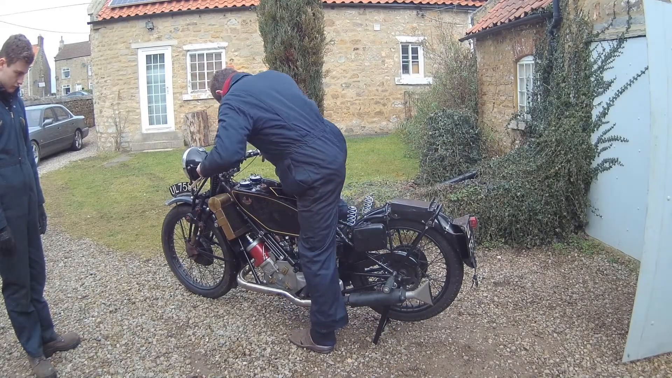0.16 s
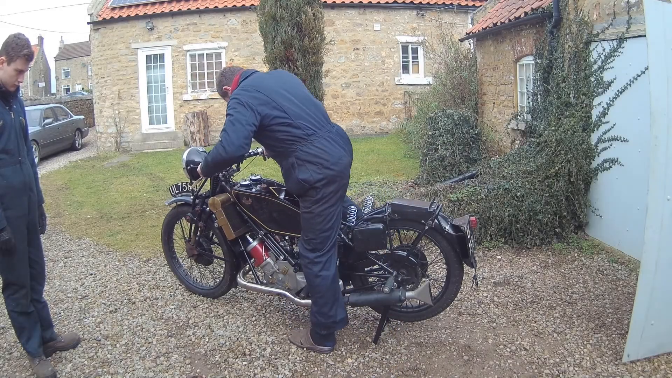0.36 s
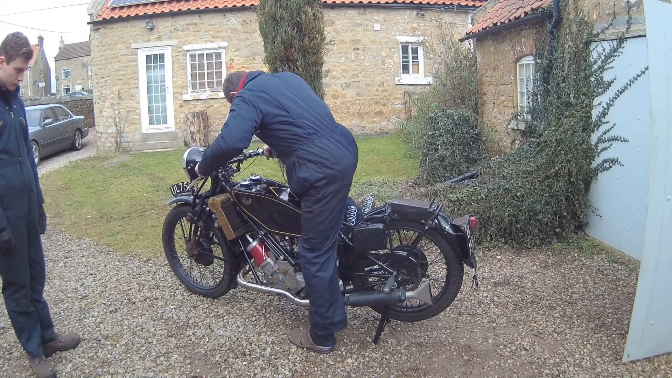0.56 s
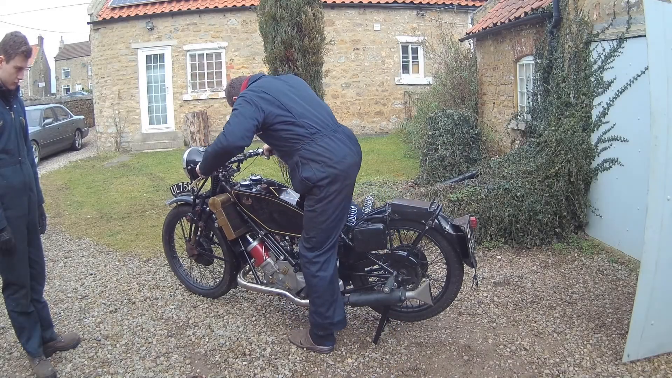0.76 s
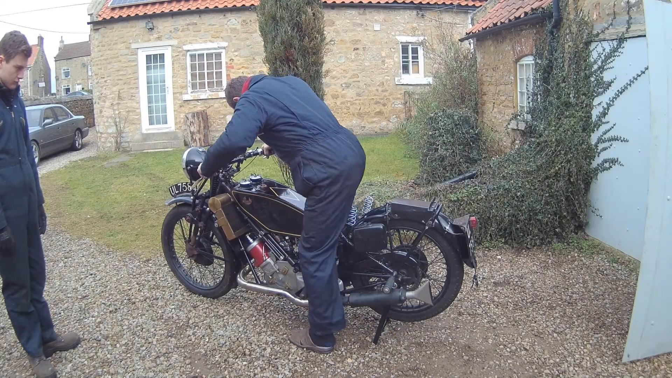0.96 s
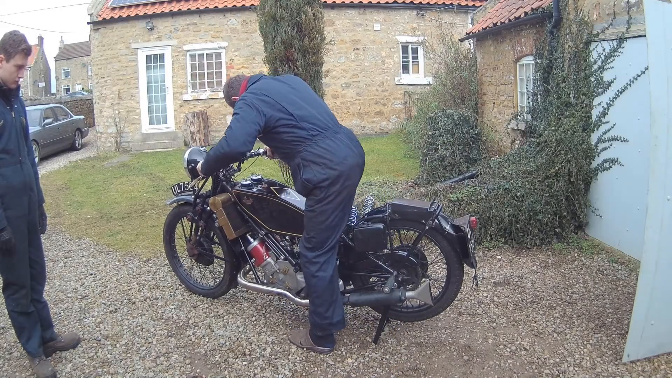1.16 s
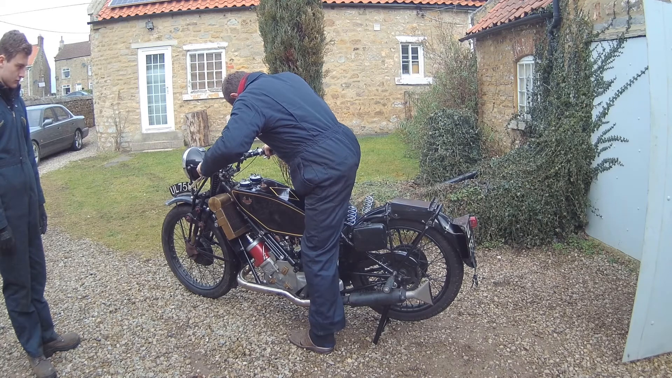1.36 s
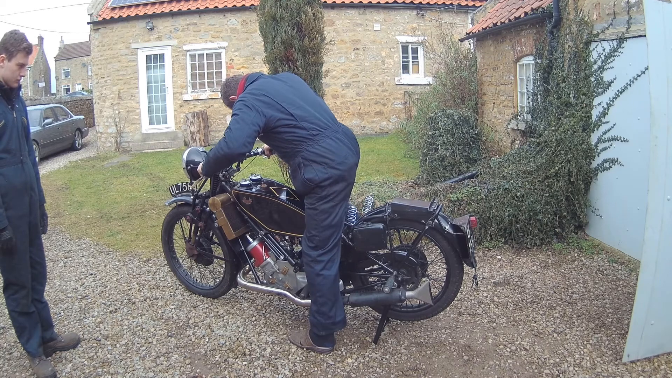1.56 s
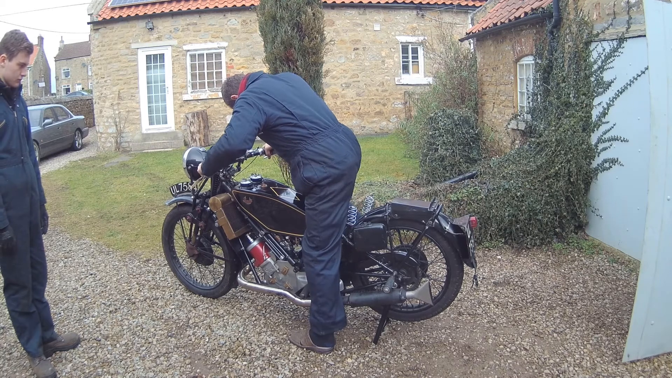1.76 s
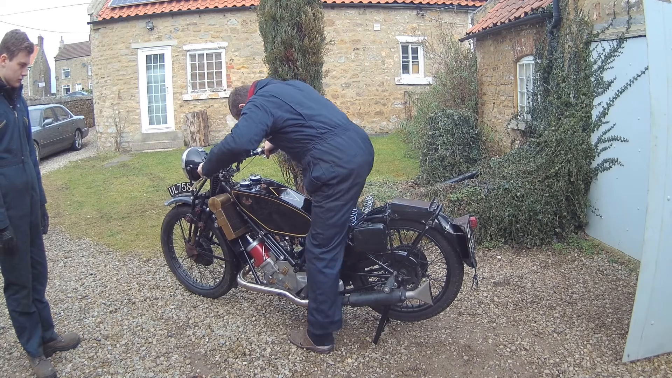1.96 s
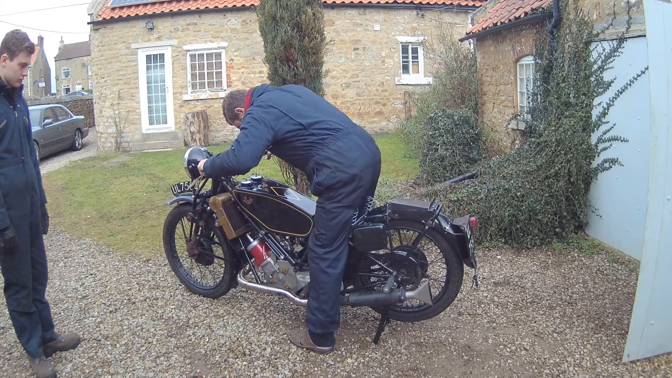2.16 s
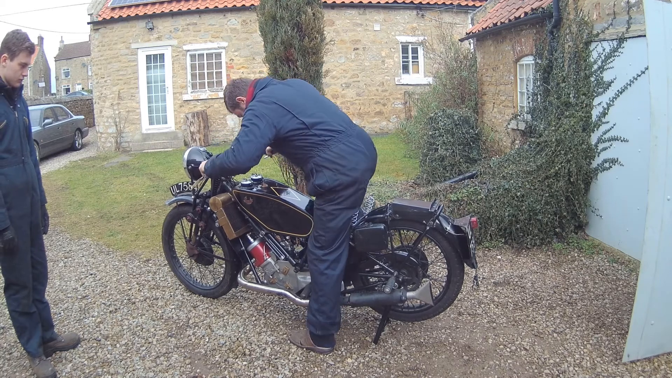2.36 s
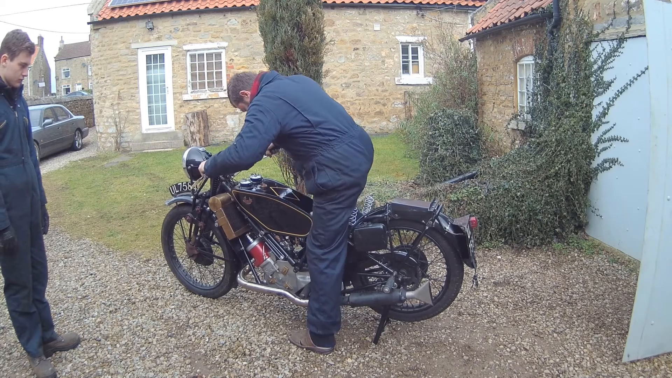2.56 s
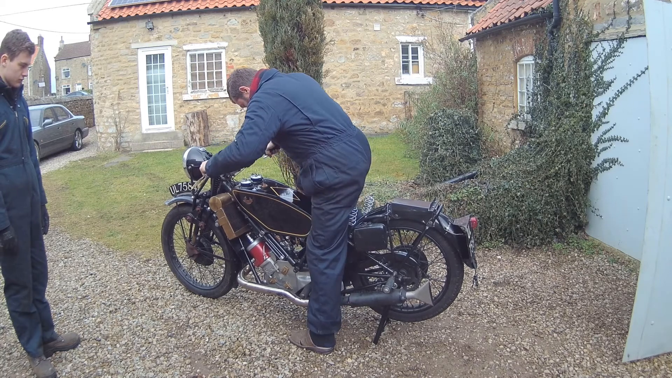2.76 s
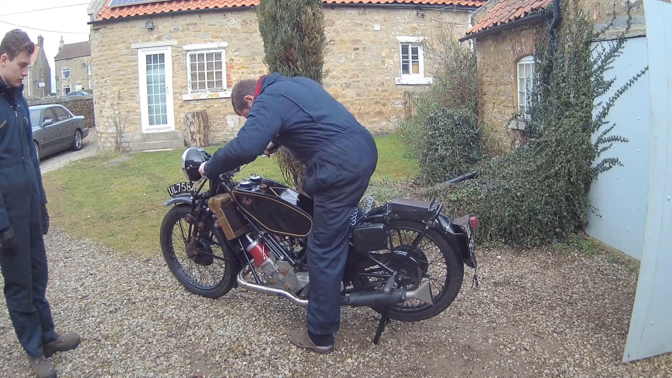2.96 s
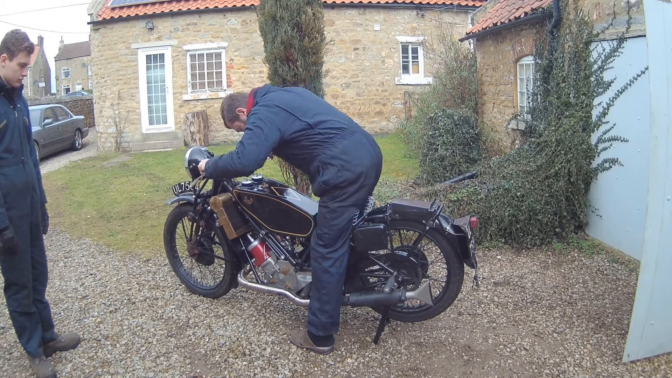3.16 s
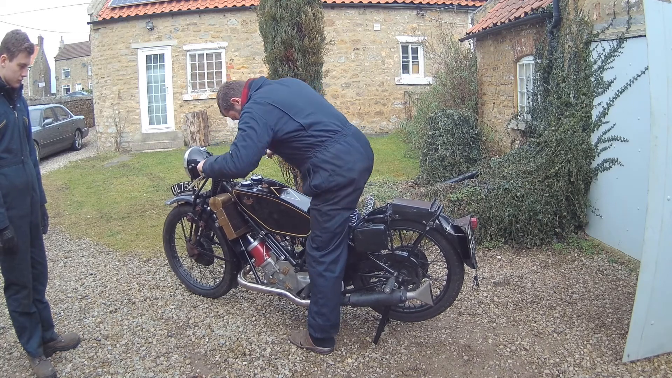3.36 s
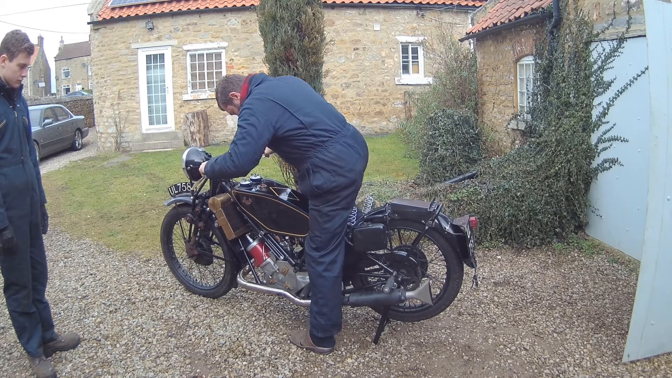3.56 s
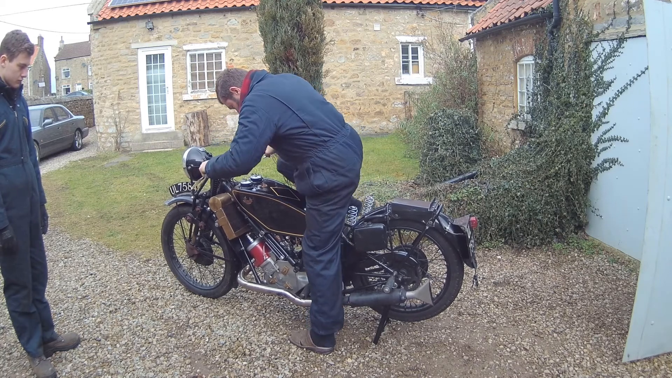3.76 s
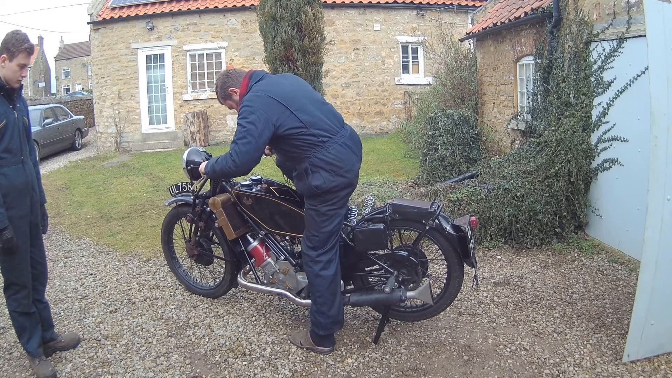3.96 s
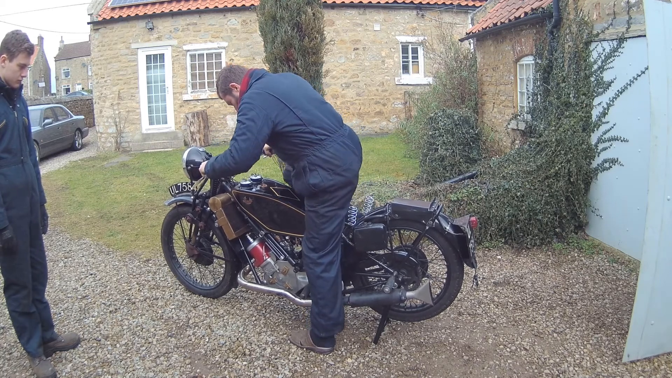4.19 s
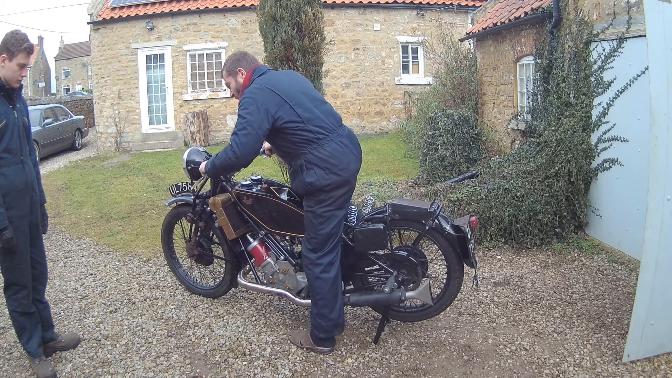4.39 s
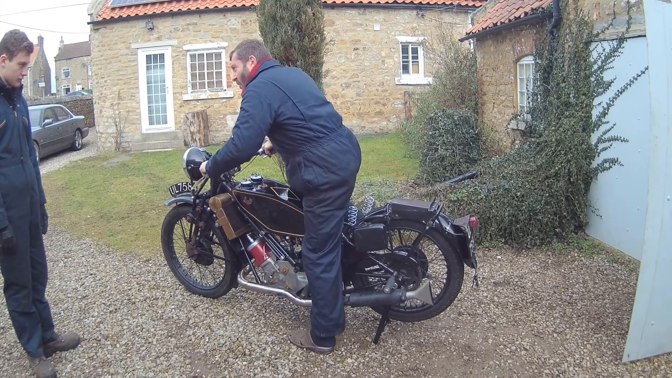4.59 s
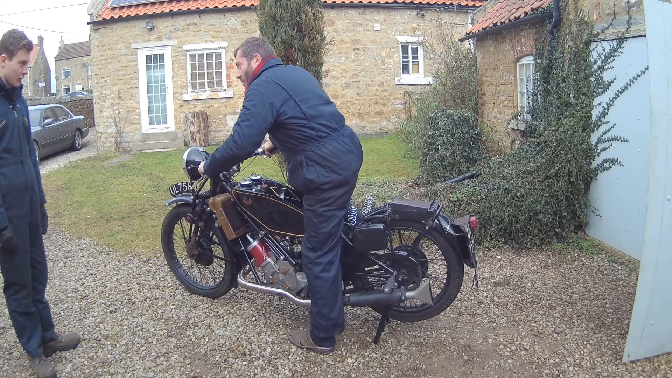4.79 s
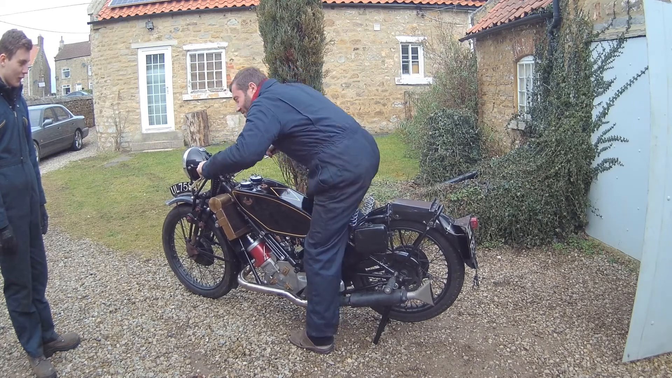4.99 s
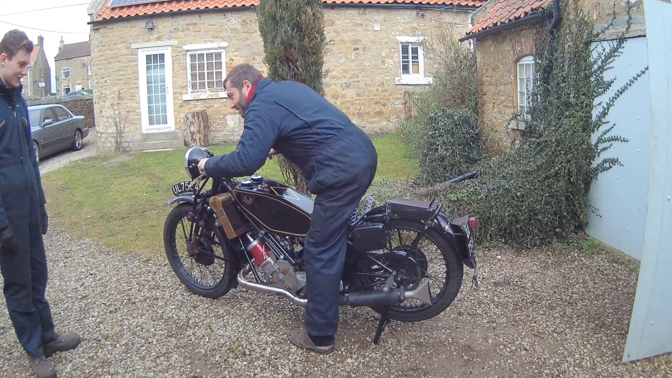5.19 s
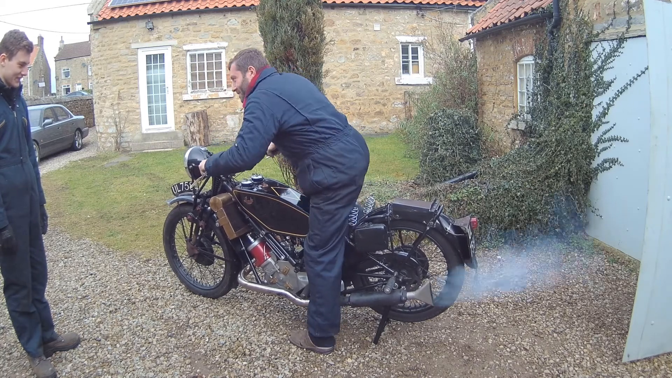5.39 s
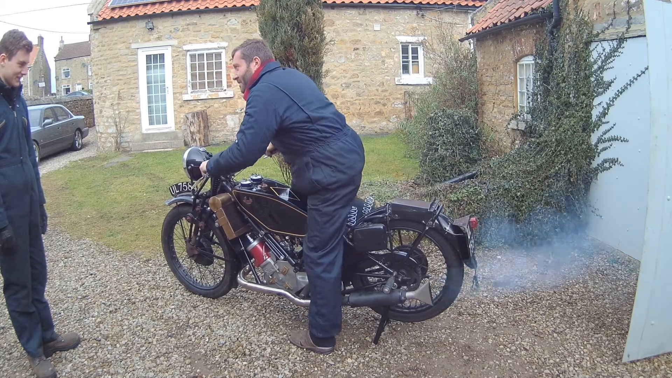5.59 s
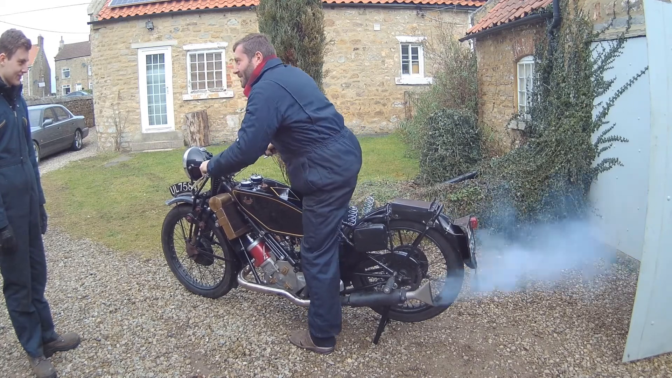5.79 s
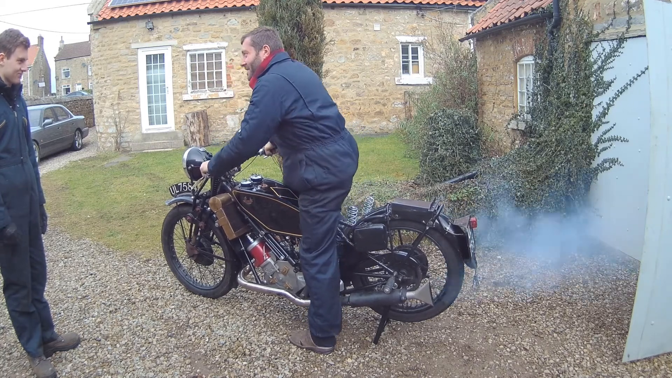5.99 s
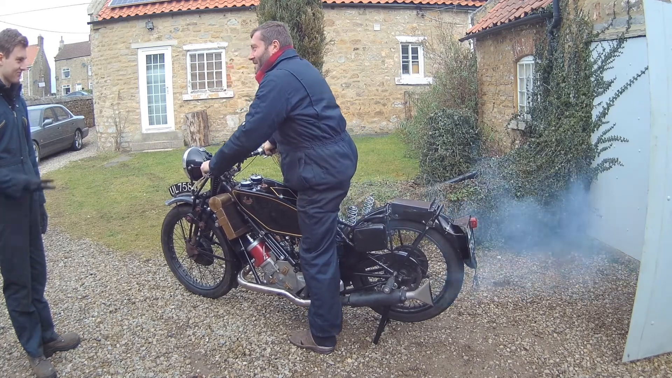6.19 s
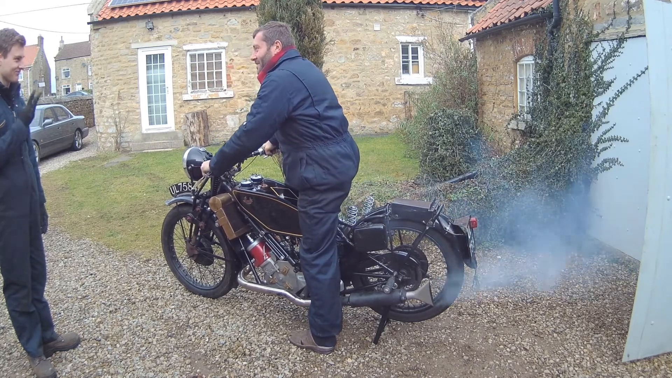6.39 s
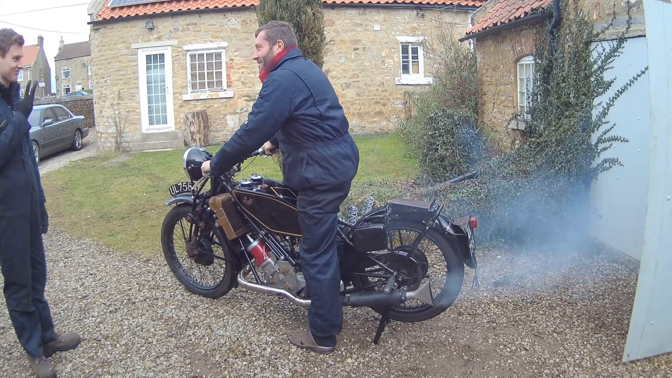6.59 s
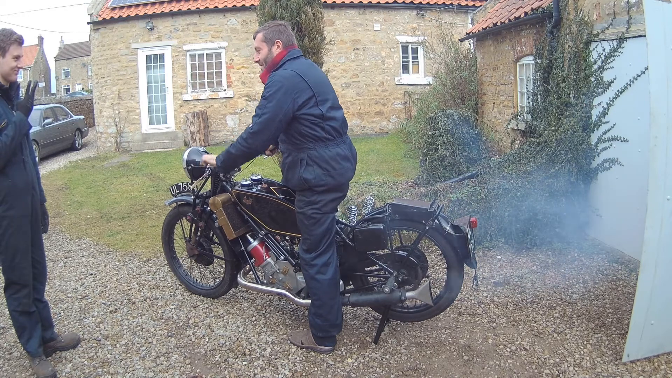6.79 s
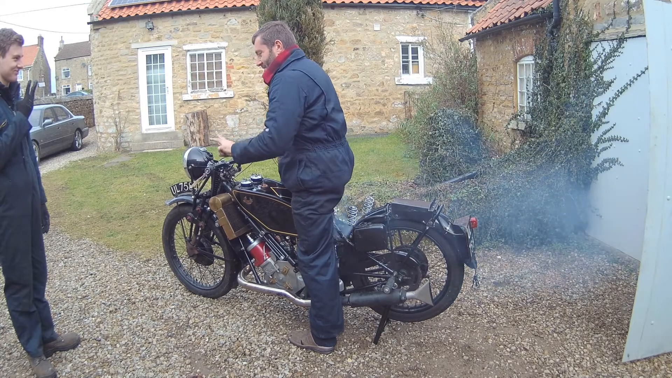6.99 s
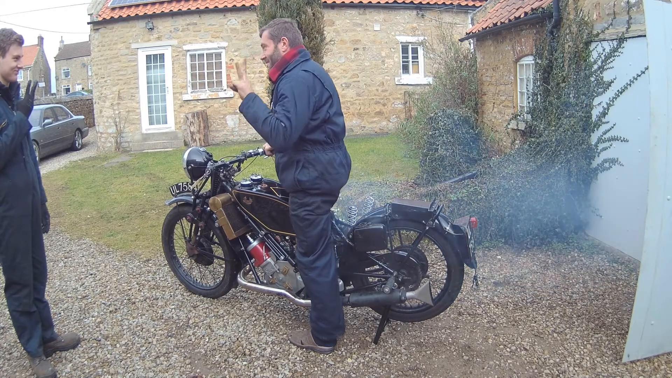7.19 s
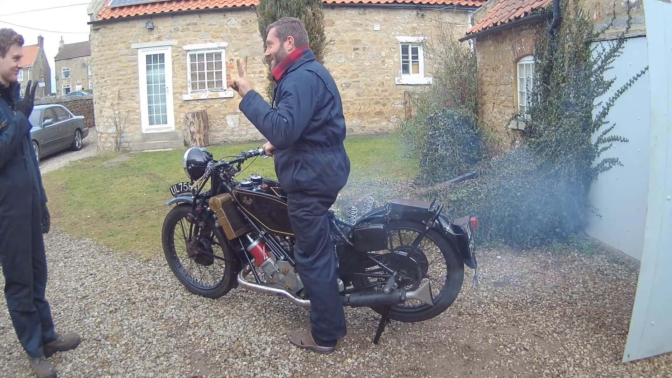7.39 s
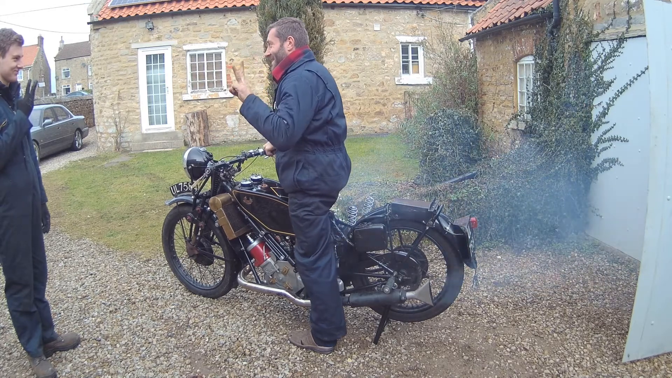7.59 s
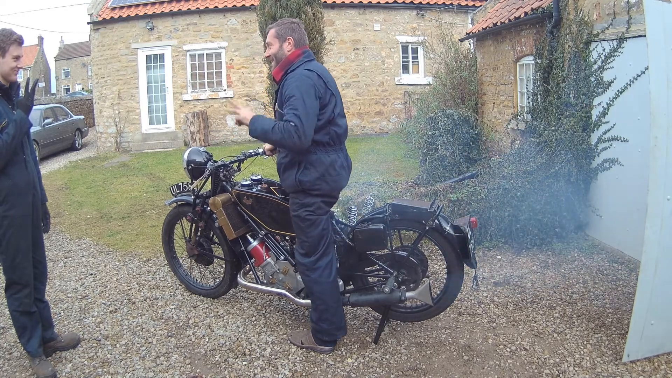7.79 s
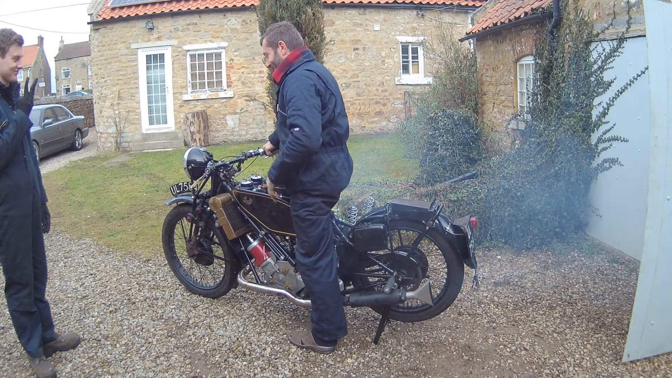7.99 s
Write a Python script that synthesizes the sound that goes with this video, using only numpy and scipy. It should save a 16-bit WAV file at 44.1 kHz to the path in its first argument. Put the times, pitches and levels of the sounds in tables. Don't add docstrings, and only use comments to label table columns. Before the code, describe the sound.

Outdoors on gravel, close to a vintage motorcycle: loose steel knocks, a lever resetting, a whirring kick with thudding pistons and brief coughs, then quiet. At about five seconds a second kick fires the engine. It surges into fast, raspy, clipped banging, drops back, and continues as a ragged two-stroke idle with gaps, pops and metallic rattle. Boxy small microphone, quick slap from stone walls.

```python
import sys
import numpy as np
from scipy import signal
from scipy.fft import rfft, irfft
from scipy.io import wavfile
from scipy.ndimage import uniform_filter1d

SR = 44100
rng = np.random.default_rng(int(sys.argv[2]) if len(sys.argv) > 2 else 0)


def invert_db(level):
    return 10 ** (np.asarray(level, dtype=float) / 20)


def dump_mix(stems):
    frames = np.atleast_2d(stems).T
    limited = np.clip(frames, -1, 1)
    pcm = np.round(limited * 32767).astype(np.int16)
    wavfile.write(sys.argv[1], SR, pcm)


N = 355005
CATCH_S = 5.03

# (time [s], level [dB])
ENGINE_LEVEL = [(5.04, -5), (5.22, 4.5), (5.52, 4), (5.76, 4), (5.91, -0.5), (6.15, -4.5), (6.52, -0.8),
                (6.9, 0.2), (7.13, -2), (7.4, -2.5), (7.75, 0.4), (8.05, -2.2)]


def rms_one(x):
    return x / np.sqrt(np.mean(x ** 2) + 1e-20)


def curve(rows):
    s, value = np.transpose(rows)
    return np.interp(np.arange(N) / SR, s, value)


def low_pass(x, hz, order):
    return signal.sosfilt(signal.butter(order, hz, fs=SR, output="sos"), x)


def resonance(x, hz, width_hz):
    r = np.exp(-np.pi * width_hz / SR)
    return signal.lfilter([(1 - r * r) / 2, 0, (r * r - 1) / 2], [1, -2 * r * np.cos(2 * np.pi * hz / SR), r * r], x)


def double_resonance(x, hz, width_hz):
    return resonance(resonance(x, hz, width_hz), hz, width_hz)


def body(x, modes):
    return sum(invert_db(db) * resonance(x + 1e-18, hz, width_hz) for hz, width_hz, db in modes)


def coloured(x, spectrum):
    hz, db = np.transpose(spectrum)
    log_bins = np.log(np.arange(len(x) // 2 + 1) * SR / len(x) + 1)
    gain_db = np.interp(log_bins, np.log(hz), db, left=-90, right=-90)
    return irfft(rfft(x) * invert_db(gain_db), len(x))


def noise(spectrum, low_hz, high_hz, grain_db):
    grains = invert_db(grain_db * np.minimum(rng.exponential(1, N), 5))
    x = coloured(rng.standard_normal(N) * grains, spectrum)
    band = signal.sosfilt(signal.butter(2, [low_hz, high_hz], "band", fs=SR, output="sos"), x)
    return x / np.sqrt(np.mean(band ** 2))


def flicker(rate_hz, depth_db):
    knots = rng.standard_normal(int(N / SR * 60) + 2)
    smooth = rms_one(uniform_filter1d(knots, max(1, int(60 / rate_hz))))
    return invert_db(depth_db * np.interp(np.arange(N) / SR * 60, np.arange(len(knots)), smooth))


def clicks(seconds, db):
    out = np.zeros(N)
    at = (np.asarray(seconds) * SR).astype(int)
    out[np.minimum(at, N - 1)] = invert_db(db)
    return out


def puffs(train, decay_s):
    return rng.standard_normal(N) * signal.lfilter([1], [1, -np.exp(-1 / (decay_s * SR))], train + 1e-18)


def swells(start, end, db, rise_db_per_s, fall_db_per_s):
    t = np.arange(0, N + 32, 32)[:, None] / SR
    rising_db = rise_db_per_s * np.maximum(start - t, 0)
    falling_db = fall_db_per_s * np.maximum(t - end, 0)
    gain = np.sqrt(np.sum(invert_db(db - rising_db - falling_db) ** 2, axis=1))
    return np.interp(np.arange(N) / SR, t[:, 0], gain)


def strokes(first_s, last_s):
    # (time [s], rate [strokes/s])
    crank_speed = np.transpose([(5.08, 27.8), (5.14, 32.3), (5.2, 38.5), (5.3, 50.0), (5.4, 63.3),
                                (5.5, 60.6), (5.7, 69.0), (5.9, 66.7), (6.0, 58.8), (6.25, 47.6),
                                (6.4, 57.1), (6.7, 57.1), (6.95, 54.1), (7.1, 47.6), (7.25, 41.7),
                                (7.4, 45.5), (7.6, 50.0), (8.05, 50.5)])
    t = np.linspace(first_s, last_s, num=64)
    turned = np.cumsum(np.interp(t, *crank_speed)) - np.interp(first_s, *crank_speed)
    count = max(int(round(turned[-1] * (t[1] - t[0]))), 1)
    return np.interp(np.linspace(0, turned[-1], count + 1), turned, t)


def firings():
    # (first [s], last [s], first level [dB], last level [dB])
    runs = [(5.0873, 5.1231, -17, -13), (5.209, 5.278, -6, -13), (5.299, 5.4009, -6, 2.5),
            (5.4161, 5.4472, 0.5, -24), (5.4936, 5.512, -0.7, -3), (5.5957, 5.6136, -1, 4),
            (5.6624, 5.677, 0.2, 6), (5.689, 5.7059, -5, 5.5), (5.7466, 5.7742, -1.5, -8),
            (5.8032, 5.817, -14, 1), (5.8734, 5.9035, -5, -3.5), (6.2757, 6.2949, -9, .4),
            (6.3542, 6.3726, -4, -2.5), (6.391, 6.4423, -10.5, -6), (6.4752, 6.5089, -17, -4),
            (6.5454, 6.5627, -13.5, -15), (6.579, 6.5961, -9, -5.5), (6.6481, 6.665, -5, -1),
            (6.7174, 6.7349, -15, -4.5), (6.7538, 6.805, -6.5, -12.5), (6.8227, 6.8571, -11, -12.5),
            (6.9294, 6.9467, -17, 4), (7.3306, 7.3549, -16, -3), (7.3997, 7.4423, -10.5, -6.5),
            (7.5069, 7.5275, -3.5, -15), (7.5496, 7.5702, -10, -5), (7.5909, 7.6324, -10.5, -12),
            (7.7304, 7.7497, -7.5, -5.5), (7.7896, 7.8078, -15, -10), (7.8863, 7.9458, -4, -10)]
    # (time [s], level [dB])
    pops = [(5.1821, -15.5), (5.4602, -9), (5.733, -30), (5.831, -16), (5.8589, -19), (6.0383, -15.5),
            (6.0754, -3), (6.1509, -5), (6.2328, -2.7), (6.3138, -13), (6.6823, -7), (6.891, -15.5),
            (6.9841, -7.5), (7.0621, -3.5), (7.1022, -10), (7.1429, -29), (7.1888, -6.5), (7.2319, -28),
            (7.2792, -21), (7.6514, -6), (7.6896, -17), (7.8274, -10), (7.9625, -30), (8.0245, -8),
            (8.0448, -7)]
    rows = list(pops)
    for first_s, last_s, first_db, last_db in runs:
        s = strokes(first_s, last_s)
        rows += zip(s, np.linspace(first_db, last_db, len(s)))
    s, crack_db = np.transpose(sorted(rows))
    engine_db = np.interp(s, *np.transpose(ENGINE_LEVEL))
    spread_db = 2 * rng.standard_normal(len(s))
    thump_db = -13 + 0.53 * crack_db + 0.45 * engine_db + spread_db
    return np.transpose([s, crack_db, thump_db])


def exhaust(rows, blast_db, pipe_db, top_db):
    # (frequency [Hz], width [Hz], level [dB])
    shell_modes = [(1480, 420, -4.5), (2100, 200, -6), (2400, 520, -.6), (2540, 35, -8), (2790, 25, -5),
                   (2680, 180, -11)]
    s, crack_db, thump_db = np.transpose(rows)
    crack = clicks(s - 0.0003, crack_db)
    crack = crack + invert_db(blast_db) * puffs(crack, decay_s=0.001)
    shell = invert_db(22.3) * low_pass(body(crack, shell_modes), 2850, order=8)
    shelf = invert_db(5.0) * resonance(resonance(crack, 3560, 180), 3800, 1500)
    edge = invert_db(top_db) * resonance(resonance(crack, 9050, 1800), 9700, 4000)
    pipe = invert_db(pipe_db) * pipe_rings(s, thump_db)
    bangs = yard(shell, scatter_db=-36.5, wall_db=-2.5)
    bangs = bangs + yard(pipe, scatter_db=-43, wall_db=-12)
    return bangs + yard(shelf + edge, scatter_db=-29, wall_db=-2.5)


def pipe_rings(s, thump_db):
    # (frequency [Hz], width [Hz], level [dB])
    silencer_modes = [(143.3, 13.5, -9.5), (180, 28, -1.5), (307, 17.8, 9.5), (914, 24, -4),
                      (1010, 24, 2.5), (1148.4, 20, 3), (1293, 30, 14), (1440, 70, 13), (1599, 158, 12),
                      (1780, 36, 4)]
    # (frequency [Hz], width [Hz], level [dB])
    header_modes = [(446.3, 16, 7.5), (467, 46, 2.5), (657, 32, 8.5), (774, 74, 3.5)]
    # (time [s], pitch [ratio])
    gas_heat = [(3.0, 0.99), (5.08, 0.9), (5.36, 1.01), (5.9, 1), (6.05, 0.92), (6.36, .98), (6.9, 1.01),
                (7.2, 0.99), (7.45, 0.98), (8.05, 0.99)]
    ratios = np.interp(s, *np.transpose(gas_heat)) + 0.015 * rng.standard_normal(len(s))
    ring = body(low_pass(clicks([0], [0]), 1300, order=4)[:SR // 3], header_modes)
    header = np.zeros(N + SR)
    steps = np.arange(SR // 4)
    for at, db, ratio in zip((s * SR).astype(int), thump_db, ratios):
        header[at:at + len(steps)] += invert_db(db) * np.interp(steps * ratio, np.arange(len(ring)), ring)
    return header[:N] + body(low_pass(clicks(s, thump_db), 1300, order=4), silencer_modes)


def yard(x, scatter_db, wall_db):
    # (delay [s], level [dB])
    walls = [(.0011, -6), (.0063, -9), (.0078, -12), (.0119, -10), (.0134, -12), (.0148, -14), (.0202, -10),
             (.0216, -15)]
    scatter_s, t60_s, tail_db = 0.02, 0.36, 1
    t = np.arange(SR // 2) / SR
    dense = 1 / (1 + (t / scatter_s) ** 6) + invert_db(tail_db - 60 * t / t60_s)
    reply = invert_db(scatter_db) * rng.standard_normal(len(t)) * dense * np.minimum(t / 0.0013, 1)
    reply[0] = 1
    for k, (delay_s, db) in enumerate(walls):
        reply[int(delay_s * SR)] += (-1) ** k * invert_db(db + wall_db)
    return signal.fftconvolve(x, reply)[:N]


def running(fired_s):
    # (frequency [Hz], density [dB/Hz])
    rattle_spectrum = [(150, -4), (250, -3.5), (538, -4), (698, -7.5), (890, -8.5), (1330, -13.5),
                       (2490, -15), (5730, -42.5), (9490, -47.5), (15200, -62), (16000, -89)]
    engine_db = curve(ENGINE_LEVEL)
    rattle = invert_db(-46.5 + 1.2 * engine_db) * noise(rattle_spectrum, 3050, 22000, grain_db=-2.0)
    rattle = rattle * flicker(30, depth_db=4.0)
    rumble = rms_one(double_resonance(rng.standard_normal(N), 39, 40))
    rumble = invert_db(-52) * flicker(2.8, depth_db=2.0) * rumble
    pump = invert_db(-37 + 0.95 * engine_db) * pumping(fired_s)
    caught = np.clip((np.arange(N) / SR - CATCH_S) / 0.13, 0, 1)
    return caught * (rattle + rumble + pump)


def pumping(fired_s):
    # (frequency [Hz], width [Hz], level [dB])
    intake_modes = [(170, 90, 0), (310, 80, -2), (450, 60, -6), (650, 80, -6)]
    s = np.concatenate([strokes(a, b)[:-1] for a, b in zip(fired_s, fired_s[1:])])
    pulses = clicks(s, 1.5 * rng.standard_normal(len(s)))
    return rms_one(body(low_pass(pulses, 510, order=4), intake_modes))


def kicking():
    # (start [s], end [s], gear whirr [dB], piston thud
    # [dB], frame sway [dB])
    swings = [(0, 0.07, -69, -95, -87), (0.262, 0.27, -76, -77, -75), (0.594, .62, -80, -79, -70),
              (.875, 0.887, -65, -57.5, -45.5), (1.33, 1.34, -67, -76, -86),
              (1.567, 1.574, -69.5, -75, -80), (2.014, 2.102, -57.5, -43.5, -46.5),
              (2.29, 2.312, -69, -61, -71), (2.4, 2.448, -66, -82, -77), (2.64, 2.643, -64, -75, -81),
              (3.039, 3.1, -56.5, -44.5, -48), (3.15, 3.474, -50.5, -57, -47),
              (3.612, 3.624, -52, -40.5, -45), (4.178, 4.2, -69, -75, -81), (5.035, 5.142, -45, -36, -41)]
    # (time [s], whirr [dB], thud [dB])
    compressions = [(3.121, -36, -30), (3.17, -48, -45), (3.251, -50, -41), (3.327, -38.5, -32),
                    (3.389, -43, -37), (3.465, -57, -39.5), (3.542, -47, -29.5), (3.62, -51.5, -53)]
    # (frequency [Hz], density [dB/Hz])
    whirr_spectrum = [(180, -18.5), (300, -4.5), (507, -4), (658, -4.5), (1170, -10.5), (2360, -6),
                      (3980, -21.5), (7180, -47), (9640, -32.5), (15000, -71)]
    # (frequency [Hz], density [dB/Hz])
    thud_spectrum = [(41, -43.5), (70, -2.5), (155, 12), (363, -4.5), (435, -10), (500, -10.5), (650, -22),
                     (1100, -120)]
    start, end, whirr_db, thud_db, sway_db = np.transpose(swings)
    whirr = swells(start, end, whirr_db, rise_db_per_s=252.5, fall_db_per_s=156.5) + invert_db(-83)
    thud = swells(start, end, thud_db, rise_db_per_s=1100, fall_db_per_s=148) + invert_db(-85.5)
    sway = swells(start, end, sway_db, rise_db_per_s=1100, fall_db_per_s=192) + invert_db(-91.5)
    ticks = jangle(whirr * (np.arange(N) < CATCH_S * SR))
    s, over_whirr_db, over_thud_db = np.transpose(compressions)
    whirr = whirr + swells(s, s, over_whirr_db, rise_db_per_s=900, fall_db_per_s=400)
    thud = thud + swells(s, s, over_thud_db, rise_db_per_s=900, fall_db_per_s=400)
    whirr = whirr * noise(whirr_spectrum, 600, 4000, grain_db=1.5) * flicker(30, depth_db=3.0)
    thud = thud * noise(thud_spectrum, 55, 520, grain_db=1.5)
    sway = sway * rms_one(double_resonance(rng.standard_normal(N), 44, 60))
    return whirr + ticks + thud + sway


def jangle(whirr):
    # (frequency [Hz], width [Hz], level [dB])
    gear_modes = [(2340, 500, -3), (3130, 500, -.6), (3900, 400, -.6), (4670, 600, -6)]
    ticks_per_s, steepness = 1500, 1.8
    ticks = (rng.random(N) < ticks_per_s / SR) * rng.standard_normal(N) * flicker(30, depth_db=2.5)
    ringing = rms_one(low_pass(body(body(ticks, gear_modes), gear_modes), 6000, order=2))
    return invert_db(-53) * (whirr / whirr.max()) ** steepness * ringing


def clanks():
    # (time [s], peak [dB], ring [Hz], brightness [dB])
    blows = [(0.085, -78, 1880, -29), (0.155, -59.5, 1460, -24), (0.254, -44.5, 1000, -40),
             (0.572, -58, 1590, -28), (0.644, -47.5, 1980, -20), (0.83, -52.5, 1620, -14),
             (0.893, -43.5, 2790, -25), (0.914, -47.5, 1820, -12), (1.104, -65, 1580, -22),
             (1.301, -41, 2150, -9.5), (1.345, -45.5, 2830, -7), (1.561, -52, 870, -32),
             (2.027, -33.5, 2100, -14), (2.101, -35.5, 2270, -16), (2.138, -45.5, 2200, -6.5),
             (2.23, -45.5, 2470, -10.5), (2.347, -45.5, 2400, -7), (2.401, -45, 2800, -6),
             (2.454, -46, 2200, -4.5), (2.638, -50, 2150, -34), (3.057, -37, 2000, -12),
             (3.382, -46.5, 1450, -14), (3.558, -23.5, 820, -17), (3.699, -42.5, 2200, -30),
             (3.781, -52, 2110, -39), (3.914, -57, 1440, -31), (3.933, -54, 1800, -17),
             (4.15, -59, 2250, -14), (4.178, -41, 1950, -46), (5.038, -37, 1700, -13)]
    # (frequency [Hz], density [dB/Hz])
    knock_spectrum = [(150, -32), (300, -2.5), (700, -2), (1500, 1.5), (2600, -1.5), (3300, -7),
                      (6000, -38), (15000, -58)]
    s, peak_db, _, bright_db = np.transpose(blows)
    dull = low_pass(coloured(puffs(clicks(s, peak_db), decay_s=0.009), knock_spectrum), 3400, order=4)
    burst = puffs(clicks(s, peak_db + bright_db), decay_s=0.007)
    sharp = body(burst, [(3630, 1200, 2.5), (9700, 2500, -22)])
    sharp = body(sharp, [(3900, 3000, 0.0056), (9650, 4000, 0.0069)])
    rings = np.zeros(N)
    t = np.arange(3000) / SR
    for start_s, level_db, ring_hz, _ in blows:
        at = int(start_s * SR)
        blow = rng.standard_normal(len(t)) * np.exp(-t / 0.0044) * invert_db(level_db)
        rings[at:at + len(t)] += resonance(resonance(blow, ring_hz, 220), ring_hz, 600)
    return yard(invert_db(1.0) * dull + invert_db(4.0) * sharp + invert_db(12.0) * rings, scatter_db=-32.5, wall_db=-3.5)


def squeak():
    # (start [s], end [s], frequency [Hz], width [Hz], level [dB])
    drags = [
        (1.792, 1.9, 3160, 30, -80),
        (1.952, 2.037, 1660, 710, -57),
        (2.975, 3.054, 1720, 400, -53),
        (2.979, 3.03, 2950, 205, -67),
        (4.755, 4.97, 650, 81, -77),
        (4.94, 5.04, 1700, 400, -53.5),
        (4.952, 5, 2950, 200, -63),
        (5.874, 5.901, 9400, 1800, -37),
        (6.941, 6.982, 9100, 1800, -37),
    ]
    t, out = np.arange(N) / SR, np.zeros(N)
    for start_s, end_s, hz, width_hz, db in drags:
        span = slice(int(start_s * SR), int(end_s * SR))
        swell = np.abs(np.sin(np.pi * (t[span] - start_s) / (end_s - start_s))) ** 0.5
        rub = rms_one(double_resonance(rng.standard_normal(len(swell)), hz, width_hz))
        out[span] += invert_db(db) * swell * rub
    return out


def still_air():
    # (frequency [Hz], density [dB/Hz])
    air_spectrum = [(24, -58), (40, -10.5), (114, 1), (143, -18.5), (179, 4), (241, -2), (859, -11),
                    (1080, -9.5), (1380, -21.5), (11500, -25.5), (15500, -46.5)]
    return invert_db(-77.5) * noise(air_spectrum, 40, 15500, grain_db=-8.0)


def scene():
    # (time [s], crack [dB], thump [dB])
    coughs = [
        (3.1095, -15.5, -31.5),
        (3.3215, -24.5, -37),
        (3.5385, -20.5, -37.5),
    ]
    fired = firings()
    bangs = exhaust(fired, blast_db=-22, pipe_db=34.0, top_db=-18)
    bangs = bangs + exhaust(coughs, blast_db=-21.5, pipe_db=40.5, top_db=-24.5)
    bangs = signal.sosfilt(signal.butter(2, 85, "high", fs=SR, output="sos"), bangs)
    engine = bangs + running(fired[:, 0])
    engine = engine - 0.87 * resonance(engine, 526.6, 87)
    return (engine + clanks() + kicking() + squeak() + still_air())[None]


def top_cut(x):
    return signal.sosfilt(signal.butter(12, 16520, fs=SR, output="sos"), x)


def record(dry):
    # (time [s], height [full scale])
    ceiling_curve = [
        (0, .49),
        (5.72, .5),
        (5.8, .33),
        (8.05, .325),
    ]
    ceiling = curve(ceiling_curve)
    clipped = low_pass(np.clip(dry, -ceiling, ceiling), 15200, order=6)
    offset = -0.0016
    return top_cut(clipped + offset)


dry = scene()
out = record(dry)
dump_mix(out)
```